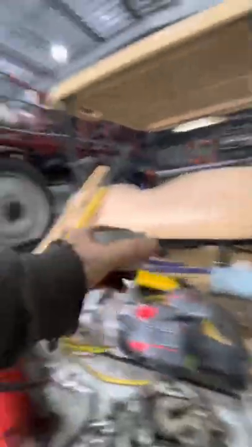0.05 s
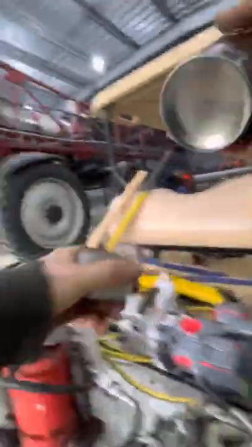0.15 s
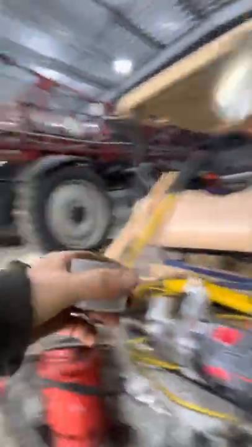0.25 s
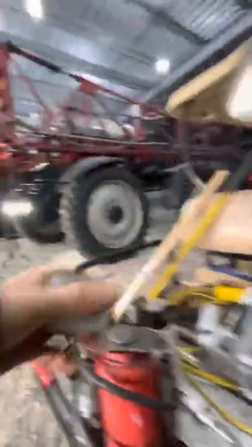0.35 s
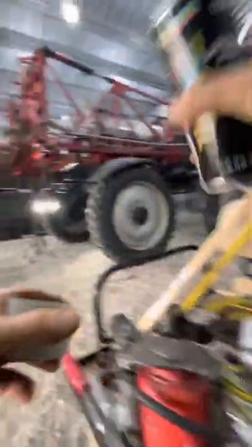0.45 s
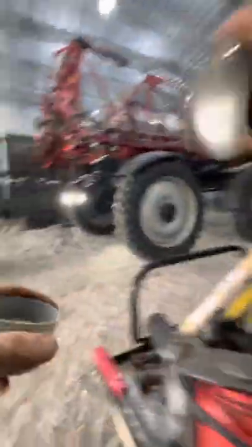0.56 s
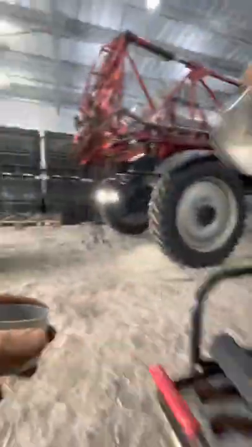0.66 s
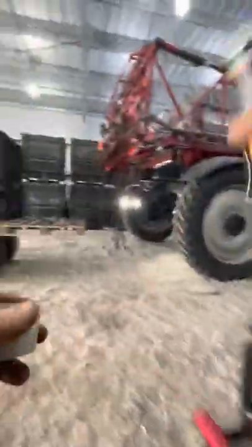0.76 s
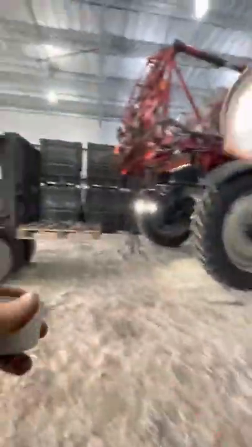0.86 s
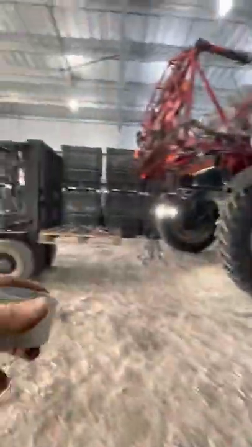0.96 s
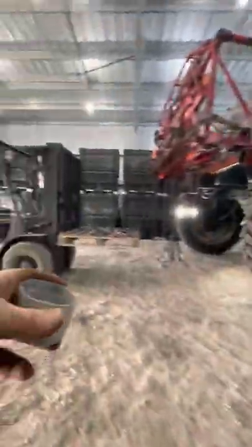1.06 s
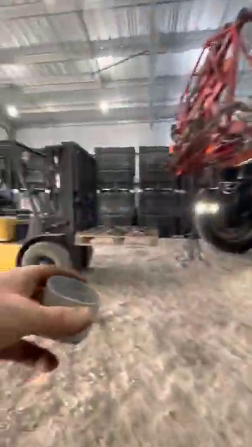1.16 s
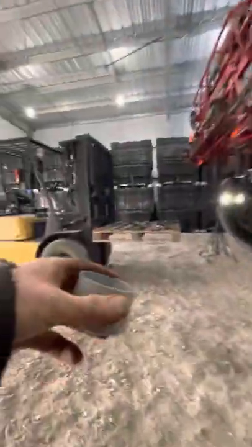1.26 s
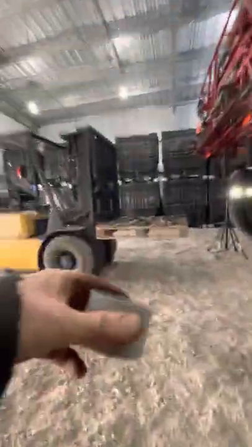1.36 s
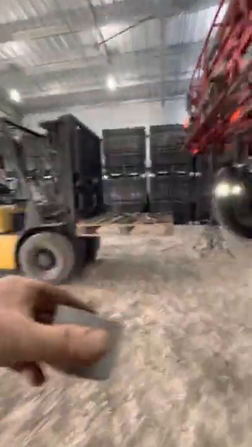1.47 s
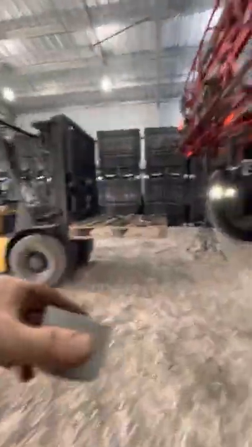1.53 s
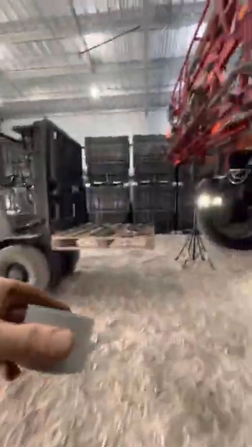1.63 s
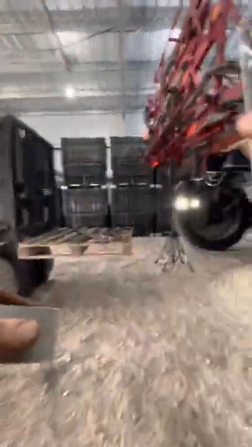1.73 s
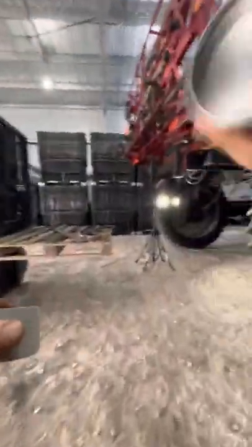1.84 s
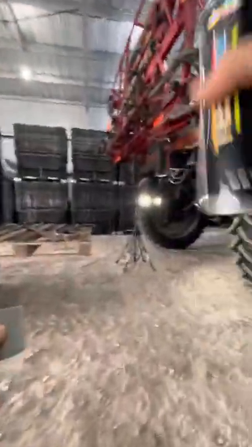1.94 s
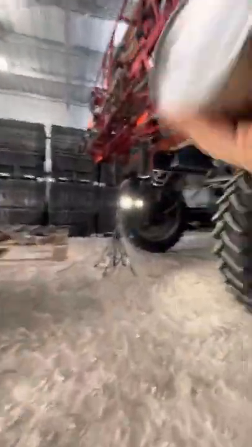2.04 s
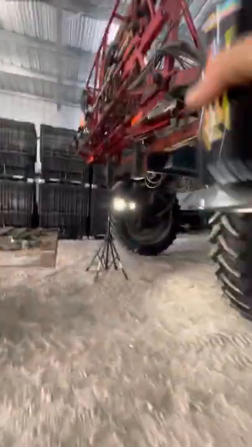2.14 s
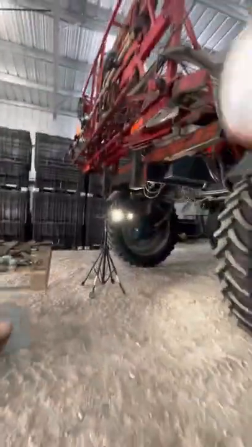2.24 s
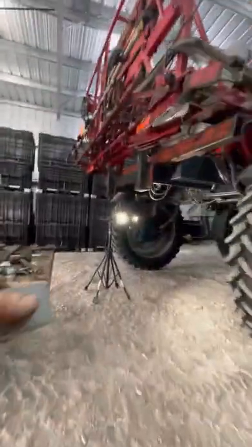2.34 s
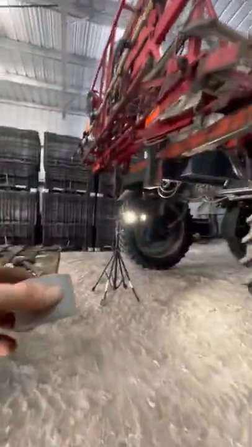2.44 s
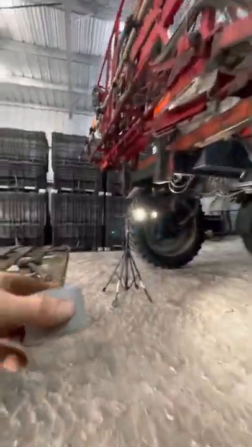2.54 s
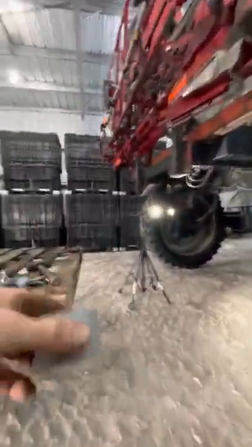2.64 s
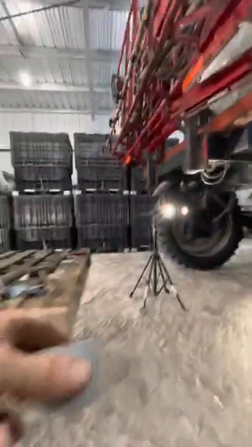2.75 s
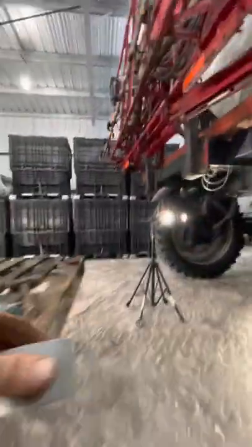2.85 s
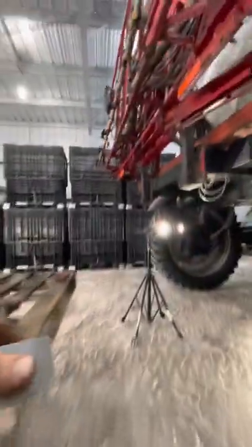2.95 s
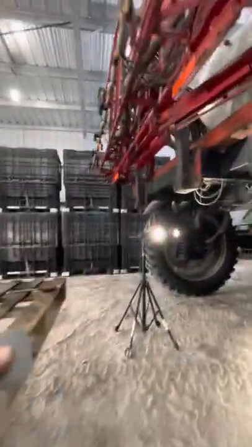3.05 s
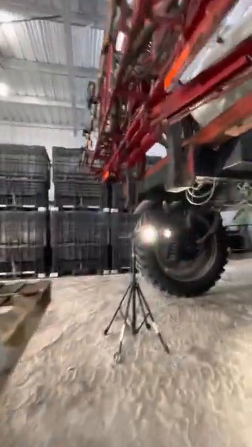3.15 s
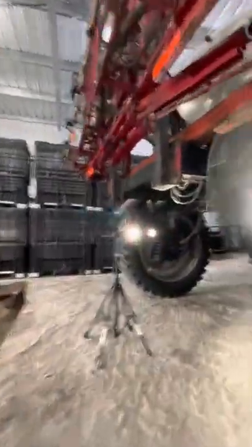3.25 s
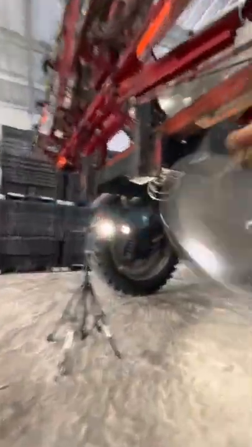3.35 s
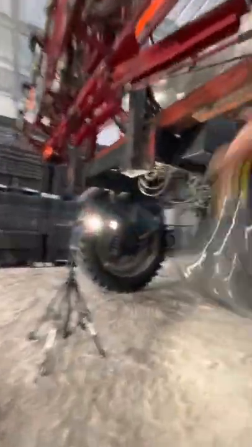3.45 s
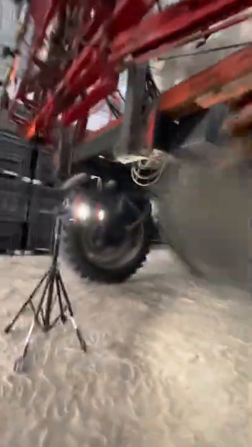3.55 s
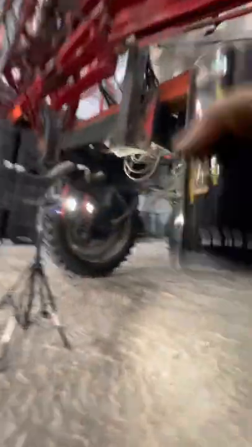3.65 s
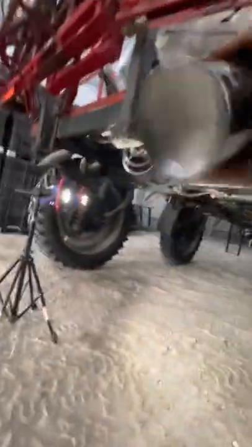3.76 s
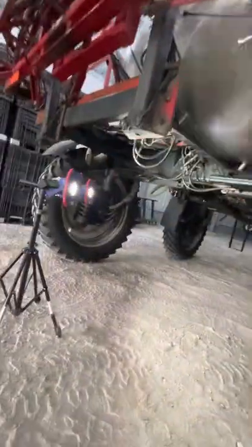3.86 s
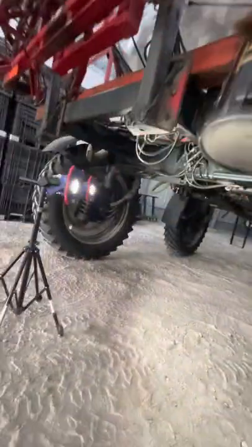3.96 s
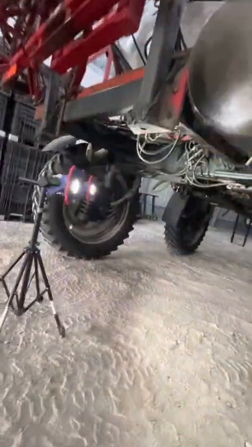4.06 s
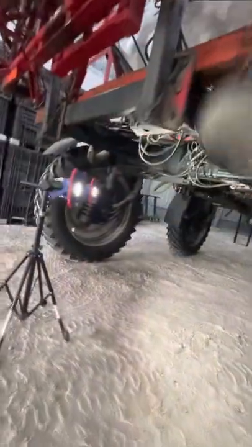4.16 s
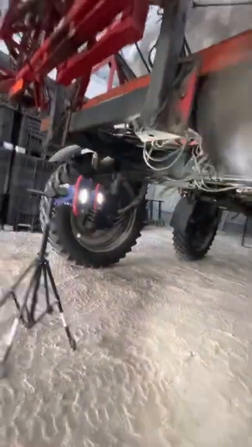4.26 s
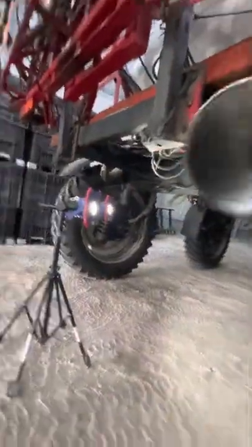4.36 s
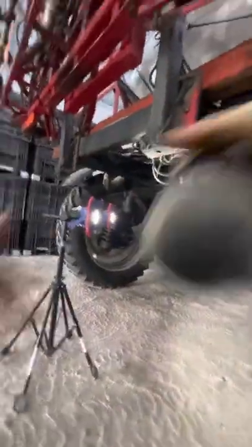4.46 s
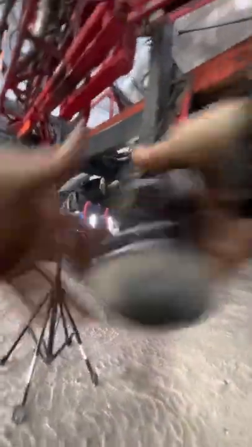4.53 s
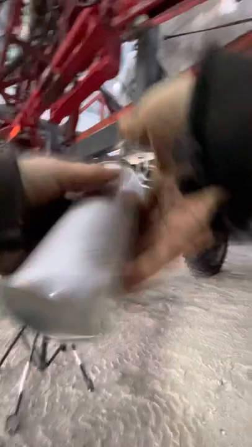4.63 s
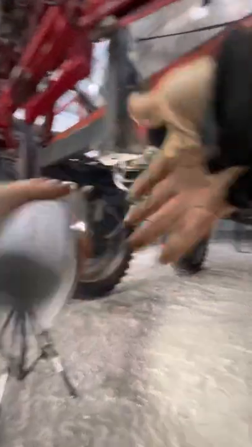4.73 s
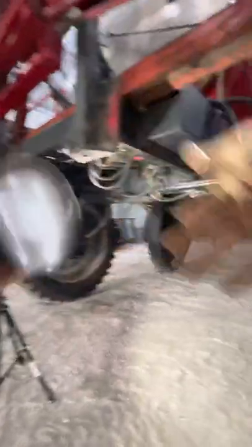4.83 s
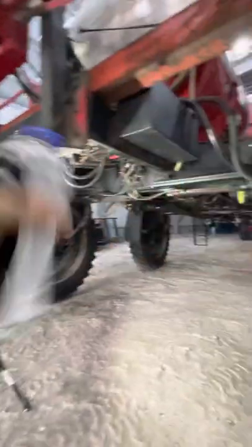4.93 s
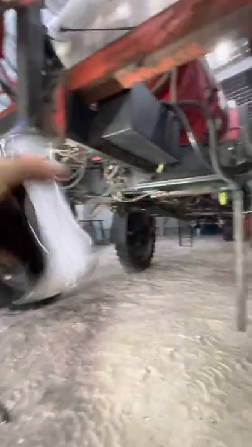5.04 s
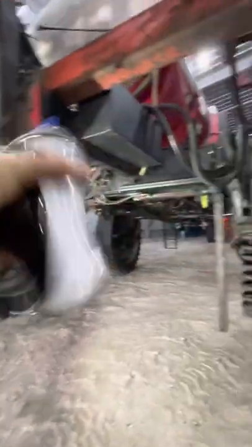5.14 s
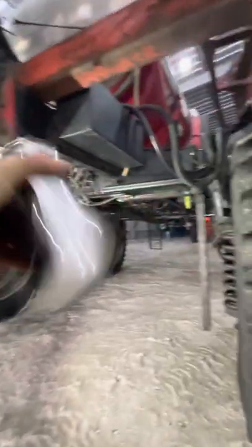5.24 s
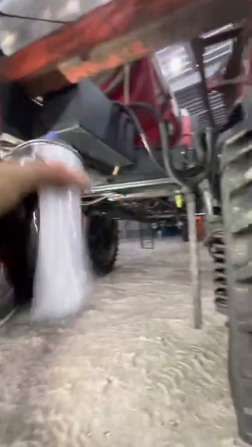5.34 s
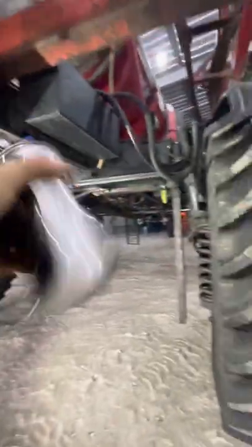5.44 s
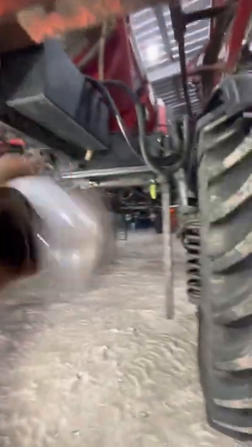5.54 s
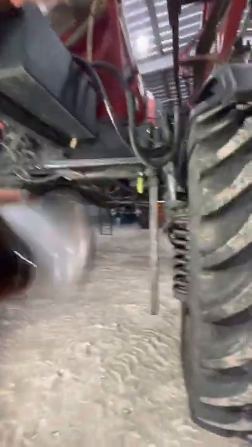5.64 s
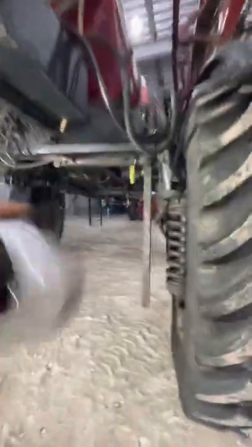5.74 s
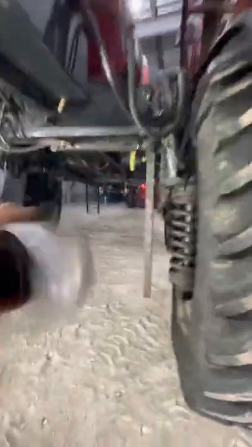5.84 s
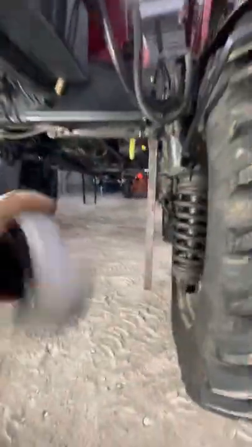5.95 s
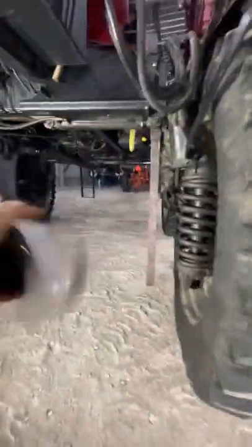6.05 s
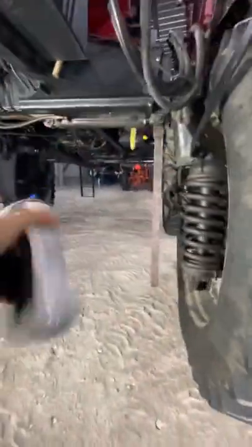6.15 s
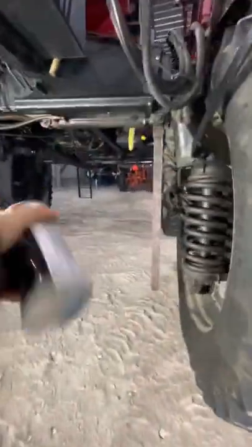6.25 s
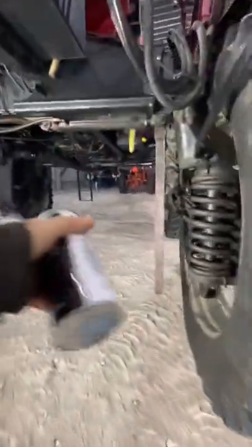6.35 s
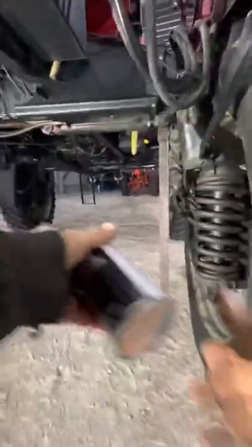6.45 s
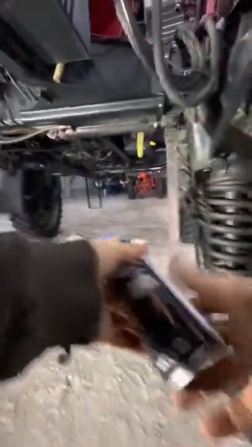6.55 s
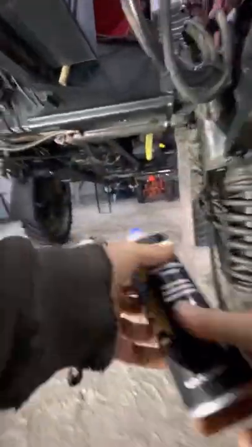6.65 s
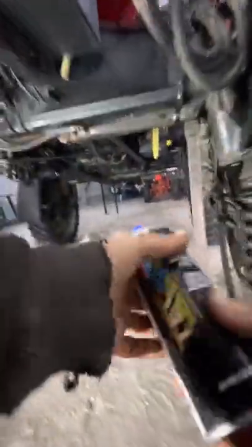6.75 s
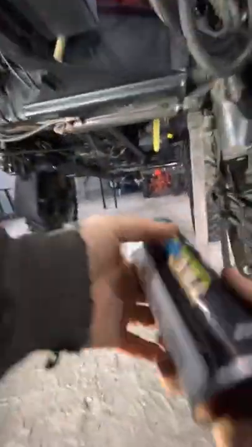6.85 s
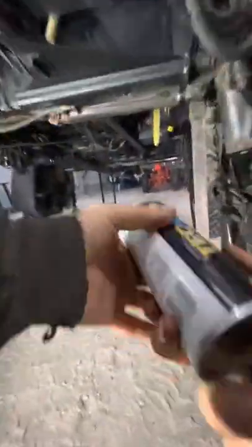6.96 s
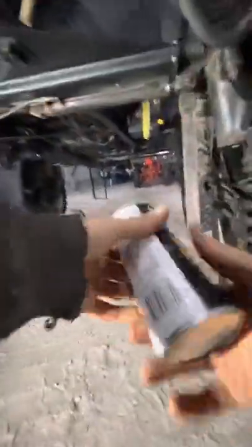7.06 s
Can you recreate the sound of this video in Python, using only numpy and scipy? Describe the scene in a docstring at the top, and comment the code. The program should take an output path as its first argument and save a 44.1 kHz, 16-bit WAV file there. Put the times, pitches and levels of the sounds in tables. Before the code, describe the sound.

A spray paint can is shaken hard close by, its mixing ball rattling in rapid bursts, with a brief lull before a denser run.

```python
"""A can of spray paint is shaken near a camera in a large shed, over a low rumble of air and washing paint.
At first it is in the right hand: a mixing ball knocks the paint-damped steel wall in bursts, rebounds,
skitters and rolls, while hands and sleeve rub and low thumps come through. After a short lull near 4.5 s it
is in the left hand, with a dense run of knocks that thins out after 6.5 s, where the rubbing swells again.
Knocks ring resonances, rolling, paint and air are shaped noise, and the shed answers with faint noise tails."""
import sys
import numpy as np
from scipy import signal
from scipy.fft import rfft, irfft, next_fast_len
from scipy.io import wavfile
from scipy.ndimage import map_coordinates

SR = 44100
rng = np.random.default_rng(int(sys.argv[2]) if len(sys.argv) > 2 else 0)


def bounce(signal):
    """Save signal as a 16-bit WAV file at the path given by the first command-line argument."""
    frames = np.transpose(np.atleast_2d(signal))
    limited = np.clip(frames, -1, 1)
    pcm = np.round(limited * 32767).astype(np.int16)
    wavfile.write(sys.argv[1], SR, pcm)


N = 312875  # length in samples


def amp(db):
    """Decibels to gain."""
    return 10 ** (np.asarray(db) / 20)


def unit(x):
    """Scale to rms 1 along the last axis."""
    return x / np.sqrt(np.mean(np.abs(x) ** 2, axis=-1, keepdims=True) + 1e-20)


def along(points, hz):
    """Read (Hz, value) points on a log frequency axis."""
    f, v = np.transpose(points)
    return np.interp(np.log(hz + 1), np.log(f + 1), v)


def curve(rows, s, column=1):
    """One column of a (seconds, value, ..) table read at times s."""
    return np.interp(s, *np.transpose(rows)[[0, column]])


def wobble(rate):
    """A smooth random curve with rate knots a second."""
    knots = rng.standard_normal(int(N * rate / SR) + 4)
    return map_coordinates(knots, [np.arange(N) * rate / SR])


def filtered(x, response):
    """Filter x with a complex response of frequency."""
    m = next_fast_len(N + SR // 2)
    return irfft(rfft(x, m) * response(np.fft.rfftfreq(m, 1 / SR)), m)[..., :N]


def mode(f, centre_hz, width_hz):
    """A causal resonance of peak gain 1."""
    return 1j * f * width_hz / (centre_hz ** 2 - f * f + 1j * f * width_hz)


def noise(spectrum, alike):
    """Stereo noise of rms 1: a shared part and each port's own part."""
    a = rng.standard_normal((3, N))
    share = np.clip(alike, 0, 1)
    mixed = np.sqrt(share) * a[0] + np.sqrt(1 - share) * a[1:]
    return unit(filtered(mixed, lambda f: amp(along(spectrum, f))))


# Colour of the air rumble. Each row: frequency in Hz, relative density in dB per Hz.
AIR = [(20, -35), (40, 1), (70, 5), (130, 3.5), (260, -6.5), (500, -41), (1500, -40), (5000, -26),
       (16000, -66)]
# Slow swell of the rumble, before its lumps. Each row: time in seconds, level in dB.
AIR_LEVEL = [(0.0, -56.5), (1.24, -61.5), (2.15, -57), (4.32, -65.5), (4.86, -57.5), (5.53, -62),
             (7.09, -55.5)]


def air():
    """The shed's low rumble, nearly the same at both ports, lumpy as the camera moves."""
    lumps_db = 3 * wobble(12)
    return amp(curve(AIR_LEVEL, np.arange(N) / SR) + lumps_db) * noise(AIR, alike=0.93)


# How fast the shed's answer dies. Each row: frequency in Hz, time to fall 60 dB in seconds.
SHED = [(300, 0.12), (2000, 0.3), (10000, 0.014)]


def shed(x):
    """Noise tails whose frequencies each die at their own speed; a new tail every third of a second."""
    out, step = np.zeros((2, N + SR)), SR // 3
    delay = 150  # samples
    for start in range(0, N, step):
        hz, t, z = signal.stft(rng.standard_normal((2, SR // 3)), SR, nperseg=256)
        decay = amp(-60 * t / along(SHED, hz)[:, None])
        tail = signal.istft(z * decay, SR, nperseg=256)[1]
        tail = tail / np.linalg.norm(tail[0])
        wet = signal.fftconvolve(x[None, start:start + step], tail, axes=1)
        out[:, start + delay:start + delay + wet.shape[1]] += wet
    return out[:, :N]


# Drag of hands and sleeve, before its lumps. Each row: time in seconds, level in dB.
RUB = [(1.2, -80), (1.4, -43), (1.7, -58.5), (2.7, -50), (3.8, -75), (6.5, -57.5), (6.72, -47.5),
       (6.82, -54), (6.92, -49), (7.09, -59)]
# Colour of skin and cloth, also heard in the thumps. Each row: frequency in Hz, relative density in dB per Hz.
CLOTH = [(80, 5), (250, 12), (700, 9), (1300, 1), (4000, -46)]


def rub():
    """Fingers and sleeve drag in lumps: friction noise with a ragged level."""
    lumps_db = 4.6 * wobble(27)
    return amp(curve(RUB, np.arange(N) / SR) + lumps_db) * noise(CLOTH, alike=0.26)


# Low thumps of the hands. Each row: start in seconds, level in dB, starting pitch above 60 Hz in Hz.
THUMPS = [(1.343, -41, 200), (2.086, -28, 610), (2.649, -44, 201), (2.711, -38, 250), (3.561, -37.5, 247),
          (4.572, -38, 396), (4.611, -29.5, 300), (4.914, -36.5, 302), (6.705, -44, 504)]


def thumps():
    """Soft, ragged low pushes whose pitch sags quickly towards 60 Hz, with a scuff of cloth."""
    out, swell = np.zeros(N + SR), np.zeros(N + SR)
    t, scuff = np.arange(SR // 8) / SR, noise(CLOTH, alike=0.87)
    for s, db, hz in THUMPS:
        turns = np.cumsum(60 + hz * np.exp(-t / 0.0059)) / SR
        shape = amp(db + 0.5 - 60 * t / 0.1) * (1 - np.exp(-t / 0.002))
        first = round(s * SR)
        out[first:][:len(t)] += shape * np.sin(2 * np.pi * turns)
        swell[first:][:len(t)] += shape
    ragged = amp(1.4 * wobble(120))
    lean_left = amp([[.8], [-.8]])
    return out[:N] * lean_left * ragged + 0.54 * swell[:N] * scuff


# How lively ball and paint are between knocks. Each row: time in seconds, level in dB.
STIR = [(0.0, -31.5), (0.33, -40), (0.79, -36), (0.95, -44.5), (1.48, -41.5), (1.74, -51.5), (2.45, -36.5),
        (3.08, -33.5), (3.51, -41.5), (3.83, -37), (4.07, -35.5), (4.44, -40.5), (4.7, -49), (4.82, -49.5),
        (5.31, -37), (6.18, -41), (6.34, -54.5), (7.09, -46)]
# The ball skitters along the wall. Each row: start in seconds, length in seconds, change of the stir in dB.
SKITTERS = [(0.345, .14, 11.5), (0.518, 0.099, 5.5), (0.795, 0.071, 10.5), (1.177, 0.067, 13.5),
            (1.597, .09, -1), (2.146, 0.098, 11), (2.395, 0.053, 4), (2.49, 0.045, 0), (2.627, 0.063, -6),
            (2.718, 0.088, 3.5), (2.823, .05, 1), (3.297, 0.085, 6.5), (3.469, 0.066, 12.5),
            (3.579, 0.13, 8.5), (3.84, 0.091, 3), (3.99, 0.063, 4), (4.38, .1, 3), (4.91, .07, 7),
            (5.29, .13, 10), (5.509, 0.072, 14), (5.636, 0.076, 9), (6.318, 0.063, 13.5), (6.882, .14, 4.5)]
EDGE_S = 0.013  # rise and fall of a skitter
HISS_FOLLOWS = 0.82  # share of a skitter's change that roll and slosh take


def stir(s, share=1):
    """The motion inside the can in dB: its slow level, shifted while the ball skitters."""
    def edge(d):
        return np.clip(d / EDGE_S + .5, 0, 1)
    skitter_db = sum(db * edge(s - start) * edge(start + lasts - s) for start, lasts, db in SKITTERS)
    return curve(STIR, s) + share * skitter_db


# Colour of the washing paint. Each row: frequency in Hz, relative density in dB per Hz.
SLOSH = [(150, -3), (400, 13.5), (1100, 18.5), (1900, -10), (2700, 11), (4000, 0.5), (6300, 8), (8000, -59),
         (16000, -117)]


def slosh():
    """Paint washes round the can in fine ripples: noise that follows the stir."""
    ripple_db = 3 * wobble(150)
    level_db = stir(np.arange(N) / SR, HISS_FOLLOWS) - 14 + ripple_db
    return amp(level_db) * noise(SLOSH, alike=0.019)


HANDOVER_S = 4.5  # from here on the can is in the left hand
# Balance of the can in each hand. Each row: frequency in Hz, left minus right in dB.
TILT_RIGHT = [(60, 13), (130, 0), (290, 5), (640, -3), (1410, -10.5), (3100, -7.5), (6820, 0.5),
              (15000, -0.5)]
TILT_LEFT = [(60, -4), (180, -4.5), (550, 9.5), (1650, 1), (4970, 2.0), (15000, 0.5)]
# Phase of the can in each hand. Each row: frequency in Hz, lead of the left port in radians.
LEAD_RIGHT = [(200, 0), (780, -2), (1290, .4), (1890, .6), (3880, 6.2), (4130, 6.4), (5080, 3), (6400, 2.1),
              (8600, 3), (13700, 3.2), (15800, 4.1)]
LEAD_LEFT = [(300, -.2), (860, -1.1), (2760, .6), (4130, 0), (5170, 1.4), (8100, 2.9), (13400, 3.3),
             (15800, 4.2)]


def ports(f, left_hand):
    """Gain and phase of the can at the two microphone ports, with constant total power."""
    lead = np.where(left_hand, along(LEAD_LEFT, f), along(LEAD_RIGHT, f))
    tilt_db = np.where(left_hand, along(TILT_LEFT, f), along(TILT_RIGHT, f))
    half = amp(tilt_db / 2) * np.exp(.5j * lead)
    return np.array([half, 1 / half]) / np.sqrt((abs(half) ** 2 + abs(half) ** -2) / 2)


ROLL_DB = -13  # over the stir
# shell resonances the rolling ball stirs
ROLL_HZ, ROLL_WIDTH_HZ, ROLL_UPPER_HZ, ROLL_UPPER_DB = 1816, 1200, 3780, -3.5


def roll():
    """The ball rolls round the wall: a hiss in the shell's resonances that swells with the stir."""
    def body(f):
        lower = mode(f, ROLL_HZ, ROLL_WIDTH_HZ) ** 2
        return lower + amp(ROLL_UPPER_DB) * mode(f, ROLL_UPPER_HZ, ROLL_WIDTH_HZ) ** 2
    s = np.arange(N) / SR
    swell_db = 3 * wobble(15) + 4 * wobble(130)
    hiss = unit(filtered(rng.standard_normal(N), body)) * amp(stir(s, HISS_FOLLOWS) + ROLL_DB + swell_db)
    left = s > HANDOVER_S
    in_left = filtered(hiss * left, lambda f: ports(f, True))
    in_right = filtered(hiss * ~left, lambda f: ports(f, False))
    return in_left + in_right


SIZE = 1024  # samples in one ball sound


def graze(count, lasts_s):
    """Spectra of rough contacts: the ball ploughs through paint before it lands."""
    t = np.arange(SIZE) / SR
    return unit(rfft(rng.standard_normal((count, SIZE)) * t ** 2 * np.exp(-t / lasts_s)))


# Upper wall modes, scattered at each knock. Each row: centre in Hz, width of each of two stages in Hz,
# relative level in dB.
CRACK = [(3720, 2280, -2), (6260, 2620, 0.5), (7670, 9200, -9), (10400, 8700, -13), (14730, 1340, -10.5)]
# How the can is held. Each row: time in seconds, rattling-on level in dB against the direct knock,
# brightness of the crack in dB per octave.
HOLD = [(0, -3, -10), (.5, 1.5, 0.5), (.9, -13, 6), (1.5, -12.5, -1), (2.2, -7, 0.5), (3, -9.5, 3),
        (4.3, -10.5, -1), (4.7, -3.5, 3.5), (5.5, -8, -0.5), (6.3, -7, 3), (7, -5, 4.5)]


def ball(s, shell_db, shell_hz, crack_db):
    """Each knock rings the shell, its upper modes and the can's bottom at new strengths."""
    count = len(s)
    f, t = np.fft.rfftfreq(SIZE, 1 / SR), np.arange(SIZE) / SR
    luck = rng.standard_normal((count, 20, 1))
    shell_db, shell_hz, crack_db = shell_db[:, None], shell_hz[:, None], crack_db[:, None]

    shell = mode(f, shell_hz, 840)
    shell = shell - .5 * mode(f, shell_hz * (1.36 + 0.18 * luck[:, 0]), 970)
    shell = shell - 0.28 * mode(f, shell_hz * (0.51 + 0.16 * luck[:, 1]), 320)
    shell = shell * mode(f, 1540, 4950) ** 2 * (1 + .5 * graze(count, lasts_s=0.00054))

    crack = 0
    for k, (hz, width_hz, db) in enumerate(CRACK):
        gain = (-1) ** k * amp(db + 1.5 * luck[:, 2 + k])
        crack = crack + gain * mode(f, hz * (1 + 0.064 * luck[:, 8 + k]), width_hz) ** 2
    crack = crack * graze(count, lasts_s=0.00029)
    crack = crack * amp(curve(HOLD, s, column=2)[:, None] * np.log2(f / 5000 + 0.08))

    bottom = mode(f, 420 * (1 + 0.058 * luck[:, 14]), 504) ** 2 * mode(f, 585, 820)
    bottom_db = 0.3 * shell_db + 0.64 * crack_db - 14.5 - 0.0035 * (shell_hz - 1700) + 2.2 * luck[:, 15]
    knock = amp(shell_db) * unit(shell) + amp(crack_db + 0.34) * unit(crack) + amp(bottom_db) * unit(bottom)

    # bending waves: treble runs round the wall first, bass last; then a fixed delay in seconds
    bend = .5 * (1 + 0.19 * luck[:, 16]) * (np.sqrt(f) - f / 130)
    knock = knock * np.exp(-1j * bend - 2j * np.pi * f * 0.001947)
    # the swinging can shifts the arrival between ports
    swing = np.exp(1j * f * 0.00016 * luck[:, 18] / (1 + (f / 6000) ** 4))
    sway = [swing * amp(3.13 * luck[:, 19]), 1 / swing / amp(1.38 * luck[:, 19])]
    pair = ports(f, s[:, None] > HANDOVER_S) * sway

    # many later, duller paths round the can and off nearby things, partly different at each port
    fade = amp(-60 * t / 0.022) * (1 - np.exp(-t / 0.00058)) * (t < .017)
    paths = rng.standard_normal((count, 3, SIZE)).transpose(1, 0, 2) * fade
    share = amp(curve(HOLD, s)[:, None] + luck[:, 17])
    later = share * unit(rfft(paths[0] + 0.51 * paths[1:])) / (1 + 1j * f / 6000)

    heard = knock * pair * (1 + later) / np.sqrt(1 + share ** 2)
    waves = irfft(heard, SIZE) * np.sqrt(0.0048 * SR)  # refers levels to an rms over 4.8 ms
    starts = np.round((s - .003) * SR).astype(int)  # early, to leave room for the delays
    where = (starts[:, None] + np.arange(SIZE)).clip(0).ravel()
    return np.array([np.bincount(where, w.ravel(), N + SIZE)[:N] for w in waves])


TICK_DB, SETTLE_DB_PER_S = -7, 102  # small ticks against the stir; their fade over 60 ms after each knock


def bounces(count=800):
    """After a knock the ball skips on over the same patch of wall, so small ticks keep that knock's colour."""
    luck = rng.random((count, 4))
    s = (np.arange(count) + luck[:, 0]) * N / SR / count
    when, _, shell_hz, knock_hard_db = np.transpose(KNOCKS)
    last = (np.searchsorted(when, s) - 1).clip(0)
    settled_db = SETTLE_DB_PER_S * (s - when[last]).clip(0, .06)
    db = stir(s) + TICK_DB - 4 * np.log(luck[:, 1] + 0.023) - settled_db
    # harder ticks trade shell for crack
    hard_db = 0.23 * knock_hard_db[last].clip(-16, 10) + 4 * (luck[:, 3] - .5)
    shell_db = db - hard_db.clip(0)
    crack_db = db + 0.99 * hard_db.clip(None, 0) - 0.5
    return ball(s, shell_db, shell_hz[last] * (0.79 + 0.33 * luck[:, 2]), crack_db)


def split(level_db, hard_db):
    """Shell and crack levels whose powers add up to the knock's level."""
    shell_db = level_db - 10 * np.log10(1 + amp(2 * hard_db))
    return shell_db, shell_db + hard_db


# The ball strikes the wall. Each row: time in seconds, level of shell and crack together in dB,
# shell pitch in Hz, hardness as crack over shell in dB.
KNOCKS = [(0.0713, -12, 2260, 22), (0.0944, -14.5, 2210, -1), (0.1267, -16, 2280, 14),
          (0.1502, -18.5, 2120, 3), (0.228, -11.5, 1600, 2.5), (0.236, -19, 1580, -8),
          (0.2525, -18.5, 1710, -8.5), (0.3302, -24.5, 1900, 0), (0.3372, -12.5, 2250, -1),
          (0.3539, -14.5, 2430, 25), (0.385, -17.5, 1750, 8), (0.4138, -22.5, 1940, 28),
          (0.4468, -21.5, 1840, -6), (0.5244, -28, 1540, -2), (0.5415, -23.5, 1820, -1),
          (0.5489, -17.5, 2240, 5), (0.5763, -28, 1360, 2), (0.7055, -15.5, 2160, -8),
          (0.7209, -16.5, 1320, -11.5), (0.7363, -23.5, 1410, -13), (0.7647, -26, 1900, -6),
          (0.7898, -18.5, 1940, -16), (0.8178, -17.5, 2140, 2), (0.826, -22, 2210, 7),
          (0.8313, -20, 2100, 11), (0.85, -25.5, 1920, 1), (0.9054, -21, 1780, -11.5),
          (0.9528, -16.5, 1390, -4.5), (0.9898, -20.5, 1460, -2), (0.9949, -15.5, 1990, -8),
          (1.0055, -21.5, 2290, -8), (1.0324, -21, 1190, 8), (1.0505, -25.5, 1440, -22),
          (1.0672, -22.5, 1600, -11), (1.1112, -17, 1060, -6), (1.1363, -36, 1340, 2),
          (1.1477, -22.5, 2170, -20), (1.1641, -27.5, 1370, -11), (1.1844, -18, 1890, -10.5),
          (1.1916, -16, 1720, 8), (1.225, -18, 1710, 7), (1.2656, -26.5, 1270, -16),
          (1.3145, -21.5, 2020, -1), (1.3453, -21, 2090, -18), (1.3546, -18, 2190, -14),
          (1.3761, -19, 1930, -9.5), (1.3897, -22.5, 1950, -12), (1.3997, -22, 2040, 9),
          (1.4448, -19, 1840, 7.5), (1.4607, -21, 1440, -28), (1.492, -35, 1970, -10),
          (1.5326, -19.5, 1350, 0), (1.5382, -24.5, 1190, -6), (1.5819, -18.5, 1580, -9),
          (1.5895, -15, 2430, -6), (1.6039, -19.5, 2010, 2), (1.6084, -16.5, 1720, 1),
          (1.6168, -20.5, 1710, 6), (1.6222, -27, 2060, 3), (1.6381, -22, 1590, 9), (1.646, -23, 1720, -16),
          (1.6637, -21.5, 1370, -12), (1.675, -23, 1620, -14), (1.6845, -24, 1970, 2),
          (1.7262, -21, 1910, -1), (1.7304, -19, 2040, -5), (1.737, -20, 2080, -2), (1.7628, -18, 2060, -6),
          (1.78, -14.5, 1320, -15), (1.7876, -17, 1520, 2), (1.8145, -15.5, 1940, 6),
          (1.821, -19, 1080, 16), (1.863, -16, 1630, -8.5), (1.8684, -15.5, 1770, -5.5),
          (1.9117, -14, 1420, 13), (1.9206, -19, 1540, 1), (1.9461, -24.5, 1100, 3),
          (1.954, -21.5, 1140, -5), (1.9719, -24.5, 1770, -2), (2.0041, -20.5, 1730, -2),
          (2.0088, -11.5, 1430, 15), (2.0183, -16.5, 1500, 10), (2.05, -23, 1460, -9),
          (2.0797, -23.5, 1690, -6), (2.142, -24, 1880, -1), (2.1497, -15.5, 1810, 5),
          (2.1557, -14, 1530, 10), (2.1632, -26, 1500, 0), (2.1724, -24, 2080, 12), (2.1834, -22, 1660, 13),
          (2.188, -20.5, 1800, 17), (2.1951, -21, 1670, 21), (2.254, -24, 1500, -6.5),
          (2.3348, -18, 2410, -6.5), (2.3798, -17, 1950, 11), (2.3866, -18.5, 1560, 10),
          (2.4142, -25, 1770, -2), (2.4882, -16.5, 1900, 2.5), (2.4954, -17, 1910, 3.5),
          (2.52, -31.5, 1460, -16), (2.5446, -25, 2280, -1), (2.5751, -22, 1860, 13),
          (2.6194, -29, 1800, 1), (2.6859, -19, 1880, -2.5), (2.692, -20, 2050, 2), (2.7163, -29, 2160, 9),
          (2.7211, -18.5, 2200, -32), (2.7377, -18.5, 2100, -16), (2.7775, -15.5, 2050, -1.5),
          (2.809, -32, 1560, -11), (2.8326, -21, 1340, -29), (2.8955, -16.5, 1800, -3.5),
          (2.9141, -17, 2020, -2.5), (2.9252, -18, 2040, -4), (2.9401, -16.5, 1210, -14),
          (2.971, -24.5, 1440, -12), (2.9965, -19.5, 2020, 4.5), (3.019, -19, 1840, 8),
          (3.027, -18.5, 1170, 5), (3.055, -21.5, 1600, -9), (3.0866, -24.5, 1370, -6),
          (3.1234, -21, 2000, -3), (3.1392, -19.5, 1170, -16), (3.1551, -16.5, 2430, -10),
          (3.1795, -18.5, 1980, 8), (3.2033, -24, 1500, 0), (3.231, -18, 1680, 3),
          (3.2781, -14.5, 2000, -4.5), (3.3026, -15.5, 1600, -2.5), (3.3191, -22.5, 1520, -6),
          (3.3258, -23, 1970, -7), (3.3445, -20, 1590, -4.5), (3.3812, -15, 1620, -2),
          (3.4167, -22.5, 1730, -7), (3.4248, -27, 1490, -3), (3.45, -23.5, 1550, -9),
          (3.4735, -19.5, 1750, -2), (3.4805, -18.5, 1670, 7), (3.4887, -18, 1820, -6),
          (3.5007, -18, 1810, -15), (3.5112, -28.5, 1600, -9), (3.5588, -18, 1880, 4),
          (3.5935, -24, 1750, -2), (3.6209, -24.5, 1360, 1), (3.6497, -29, 1960, -16),
          (3.657, -19.5, 2000, 2), (3.6874, -25, 2090, 10), (3.7021, -16.5, 1790, 12),
          (3.7182, -25, 1660, 6), (3.8009, -20, 1870, 5), (3.8175, -24, 1970, 1), (3.824, -25.5, 2060, 1),
          (3.8587, -23.5, 1520, 0), (3.8684, -16.5, 1580, 24), (3.8898, -25.5, 1870, -2),
          (3.9704, -23, 2060, 3.5), (3.9843, -24.5, 2020, 2), (4.009, -24, 2000, 5), (4.024, -26, 1460, 20),
          (4.0326, -19.5, 1440, 12), (4.0566, -37, 1780, -11), (4.1271, -22, 1850, 9),
          (4.1352, -23, 2150, -6), (4.1665, -20.5, 1610, 18), (4.1744, -30, 1250, 8),
          (4.1863, -22, 1290, 19), (4.2065, -31, 1120, 2), (4.2924, -23.5, 2230, 8), (4.2955, -28, 1740, 9),
          (4.3115, -27.5, 2030, 10), (4.3261, -30, 1980, 19), (4.613, -18.5, 1940, 6.5),
          (4.6211, -22.5, 1730, 6.5), (4.672, -22.5, 1920, -14), (4.6955, -22, 1820, -8),
          (4.7001, -20, 1780, -11), (4.7127, -18, 1870, 0), (4.7379, -23.5, 2030, 0),
          (4.7614, -21, 1700, 11), (4.824, -20, 1690, -11), (4.8797, -21.5, 1630, -10),
          (4.8918, -18, 1490, -13), (4.9194, -11.5, 1920, -2.5), (4.95, -13, 1650, -28),
          (4.9619, -13, 1750, -6.5), (4.9712, -20, 2280, -1), (5.0103, -13.5, 1360, -2),
          (5.0192, -20, 1550, -8), (5.0892, -21, 1770, -15.5), (5.0981, -22.5, 1400, -25),
          (5.1426, -12.5, 1320, -19), (5.154, -14, 1810, -2), (5.1857, -21, 1870, 0.5),
          (5.2304, -15.5, 1360, -17.5), (5.2509, -23, 1750, -10), (5.2666, -20, 1660, -11),
          (5.2707, -12.5, 1700, -16.5), (5.2955, -11.5, 1370, -12), (5.302, -18, 1790, -3),
          (5.313, -14.5, 1340, -20), (5.3222, -19, 1770, -27), (5.3327, -19, 1380, -22),
          (5.344, -15.5, 1380, -8), (5.3506, -15, 1410, 10), (5.3782, -12, 1160, -5),
          (5.408, -17.5, 1840, -30), (5.4488, -25.5, 1570, -19), (5.4792, -13.5, 1450, -6.5),
          (5.5047, -16, 1800, -18), (5.5164, -16.5, 1890, -6), (5.5373, -17.5, 1570, -7),
          (5.5636, -31.5, 1460, -4.5), (5.6183, -20.5, 1550, -32), (5.7046, -11.5, 1800, -2.5),
          (5.724, -19.5, 1750, -11), (5.761, -16.5, 1320, 1), (5.7945, -28, 1490, 0),
          (5.8178, -17.5, 1400, -13), (5.8579, -21.5, 1460, -20), (5.8838, -27, 1310, -16),
          (5.8912, -21, 1380, -17), (5.9079, -12, 1520, -3), (5.9356, -16.5, 1720, -15),
          (5.9624, -20.5, 1550, 0.5), (6.0323, -16.5, 1670, -17), (6.0702, -18, 1460, -14),
          (6.099, -18.5, 1310, -3), (6.1103, -18, 1260, -8), (6.1449, -21.5, 1640, -10.5),
          (6.1803, -23, 1550, -18), (6.1902, -16, 1330, -1), (6.2252, -21.5, 1800, 4),
          (6.2341, -25, 1410, -13), (6.2853, -21, 1440, -9.5), (6.3148, -24.5, 1880, -8.5),
          (6.3473, -32, 1820, -12), (6.5196, -24, 1120, 5.5), (6.5301, -24, 1330, 13),
          (6.5782, -26.5, 1320, -6), (6.6026, -29, 1790, 28), (6.6264, -21, 1550, 6),
          (6.684, -32.5, 1460, 4), (6.698, -26.5, 1400, 4), (6.7913, -20.5, 1370, 10),
          (6.796, -26, 1490, 12), (6.8457, -34, 1640, 9)]
REBOUND_S = .013  # scale of the flight, on top of 5 ms
REBOUND_LOSS_DB, REBOUND_SCATTER_DB = 14, 9  # typical loss and its spread
CLEAR_S = .011  # a rebound needs this long before the next knock


def knocks():
    """The ball strikes and flies back for a rebound, usually weaker, unless the next knock comes first."""
    s, db, hz, hard_db = np.transpose(KNOCKS)
    luck = rng.standard_normal((len(s), 4))
    flight = .005 + REBOUND_S * np.exp(.5 * luck[:, 0])
    lands = flight + CLEAR_S < np.diff(s, append=N / SR)
    back_db = db - REBOUND_LOSS_DB - REBOUND_SCATTER_DB * luck[:, 1].clip(-1, 3)
    back_db = back_db - 100 * ~lands  # silences a rebound that is overtaken
    back_hard_db = .5 * hard_db - 5 + 6 * luck[:, 2]
    back_hz = hz * (1 + .12 * luck[:, 3])
    shell_db, crack_db = split(np.r_[db, back_db], np.r_[hard_db, back_hard_db])
    return ball(np.r_[s, s + flight], shell_db, np.r_[hz, back_hz], crack_db)


def scene():
    """The can, the shed's faint answer to its right port, and the sounds around it."""
    can = knocks() + bounces() + roll()
    answer = amp(-22.5) * shed(can[1])
    return can + answer + slosh() + air() + rub() + thumps()


TOP_HZ = 16500  # band limit


def record(dry):
    """The input stage rounds off the highest peaks; a steep filter removes what lies above the band limit."""
    rounded = dry / (1 + np.abs(dry / .75) ** 5) ** (1 / 5)
    return filtered(rounded, lambda f: 1 / (1 + (f / TOP_HZ) ** 120))


dry = scene()
out = record(dry)
bounce(out)
```